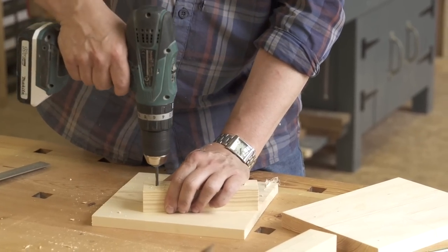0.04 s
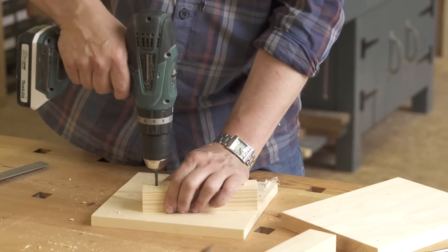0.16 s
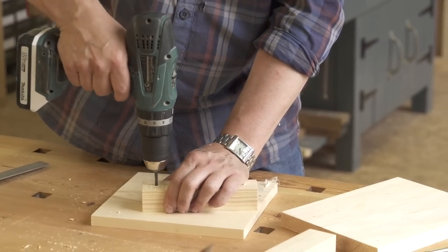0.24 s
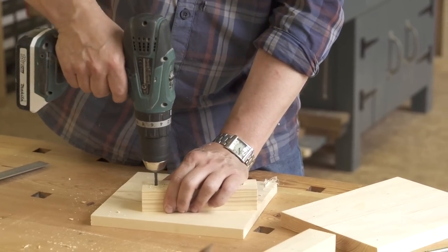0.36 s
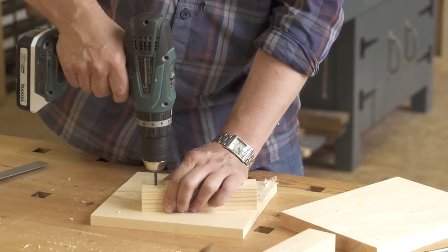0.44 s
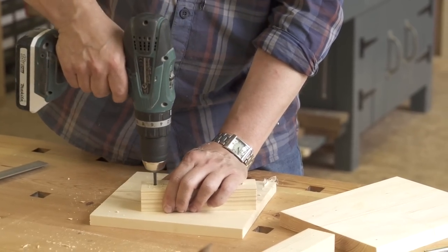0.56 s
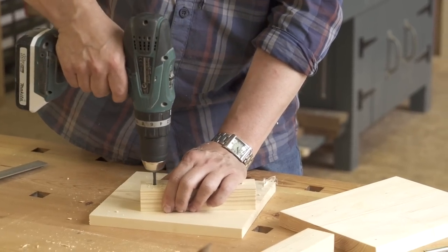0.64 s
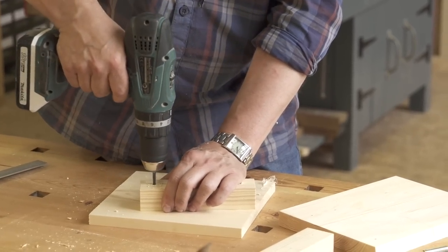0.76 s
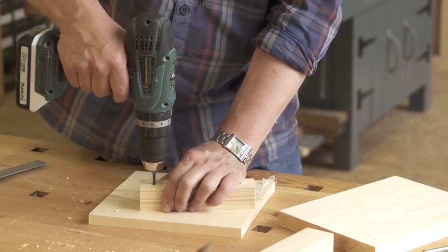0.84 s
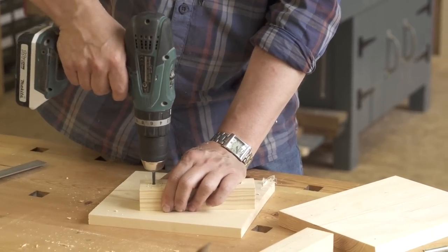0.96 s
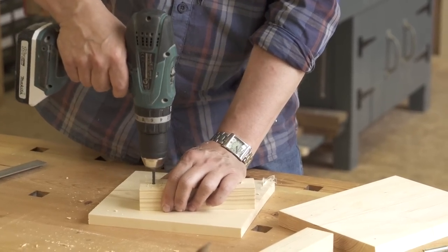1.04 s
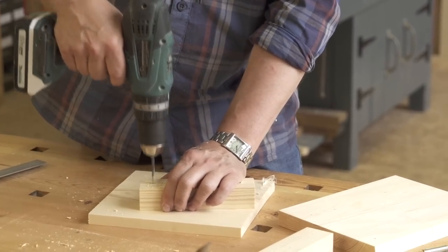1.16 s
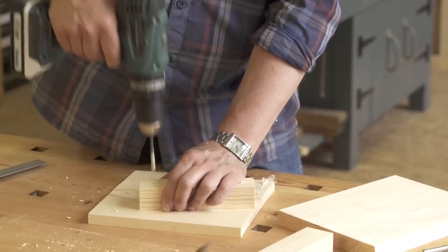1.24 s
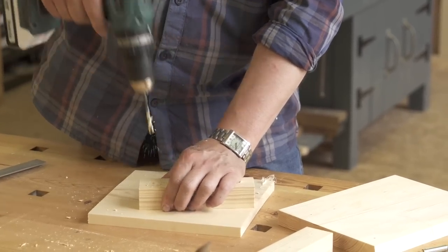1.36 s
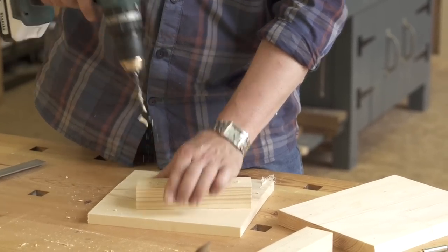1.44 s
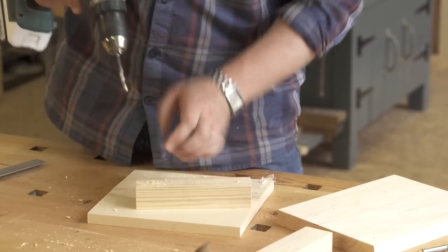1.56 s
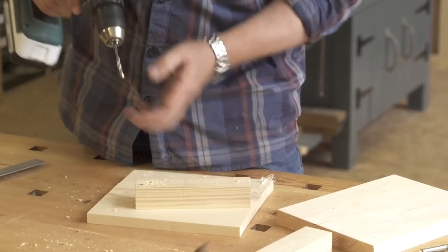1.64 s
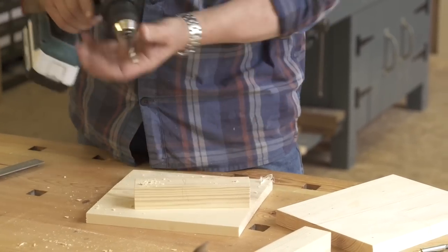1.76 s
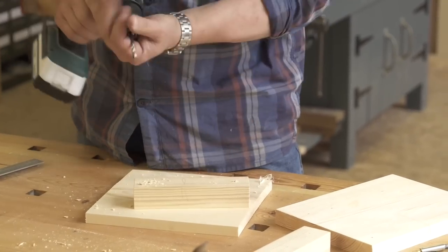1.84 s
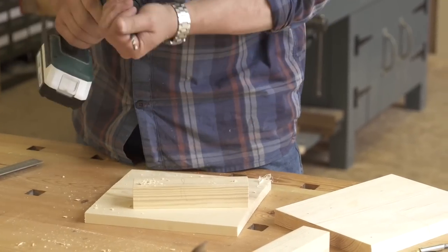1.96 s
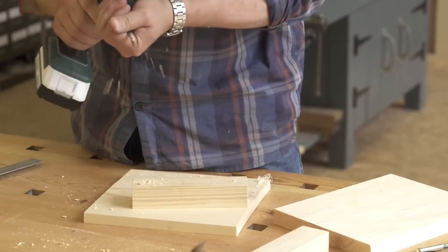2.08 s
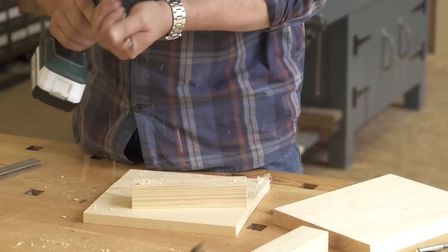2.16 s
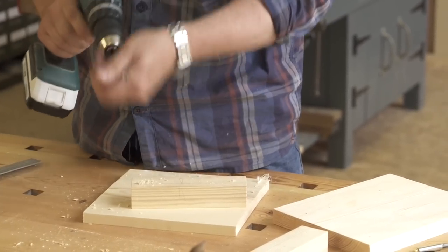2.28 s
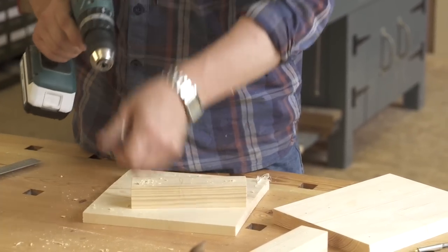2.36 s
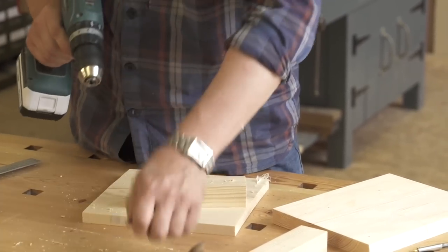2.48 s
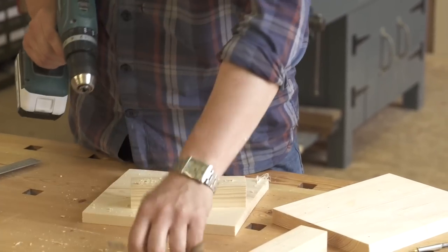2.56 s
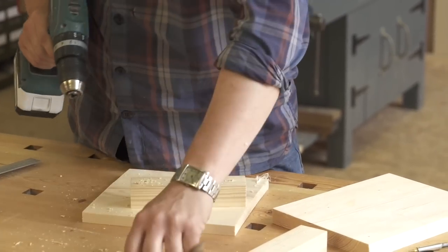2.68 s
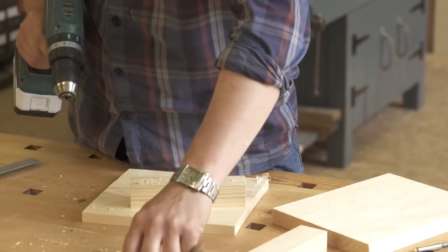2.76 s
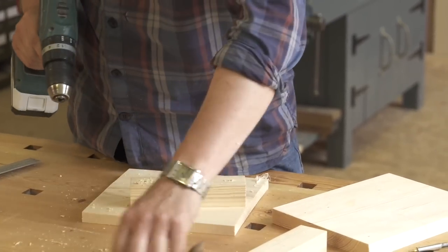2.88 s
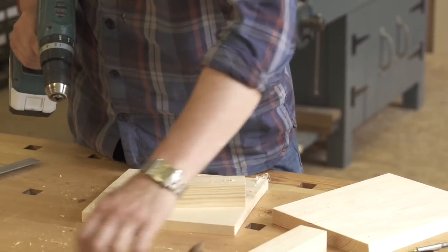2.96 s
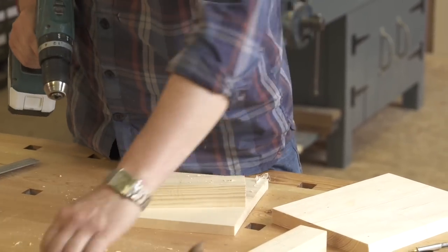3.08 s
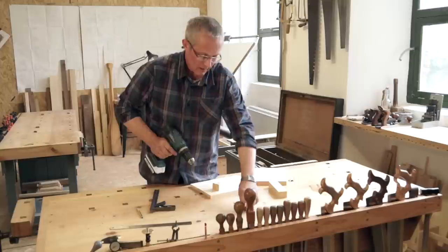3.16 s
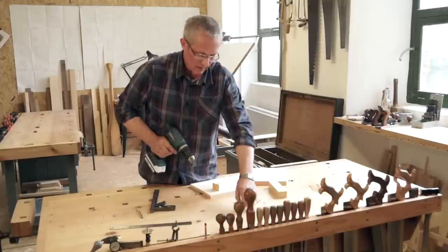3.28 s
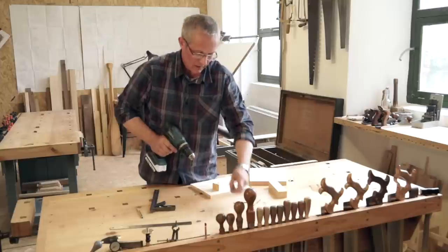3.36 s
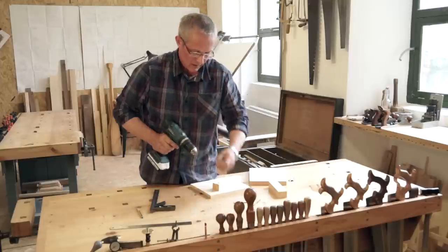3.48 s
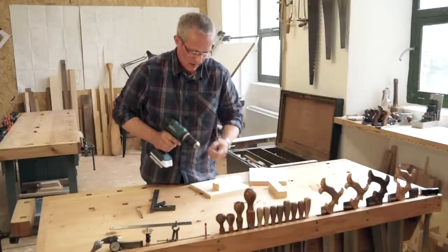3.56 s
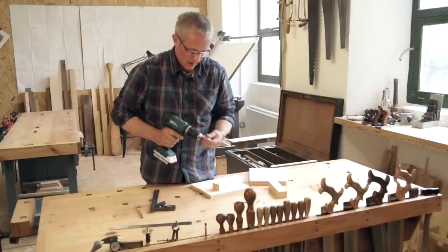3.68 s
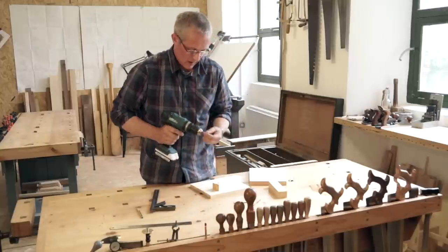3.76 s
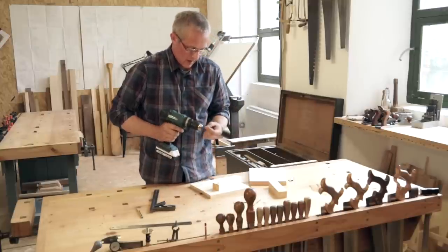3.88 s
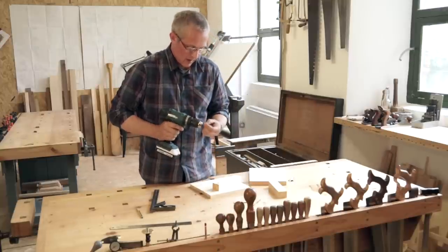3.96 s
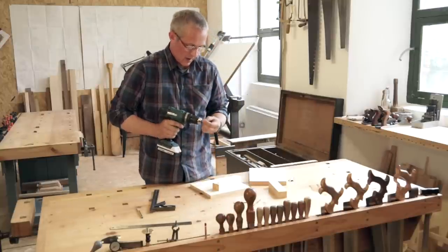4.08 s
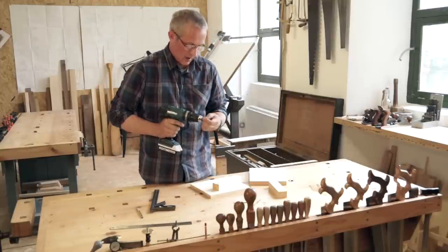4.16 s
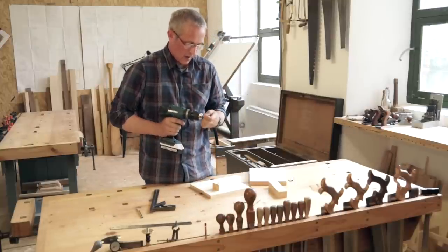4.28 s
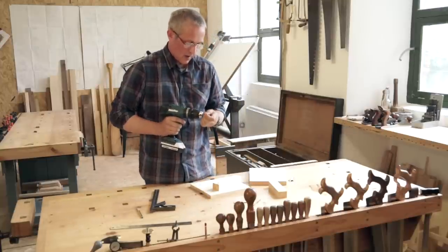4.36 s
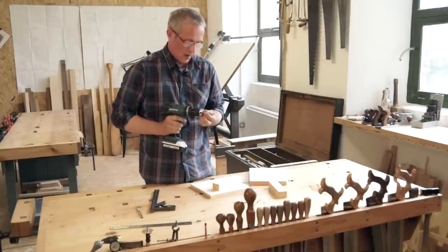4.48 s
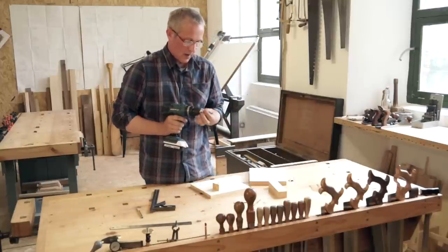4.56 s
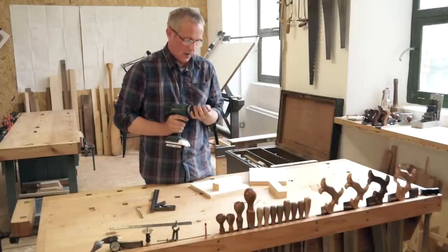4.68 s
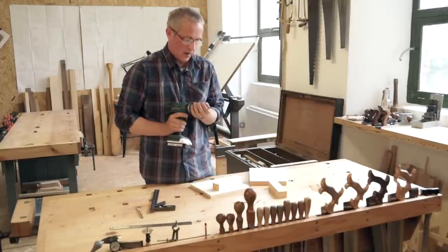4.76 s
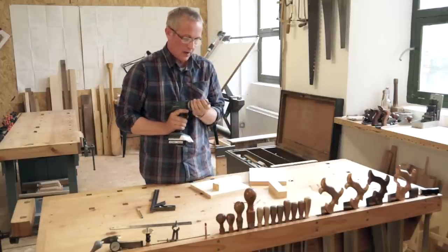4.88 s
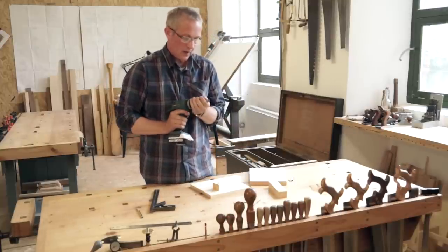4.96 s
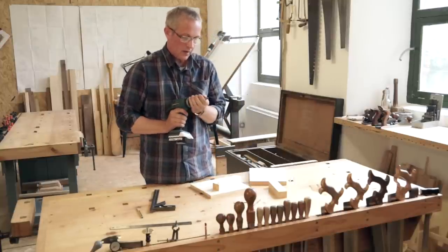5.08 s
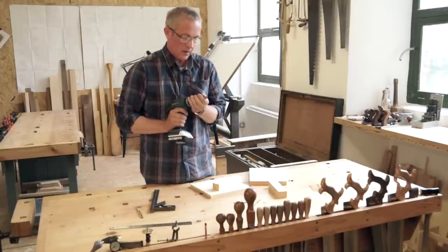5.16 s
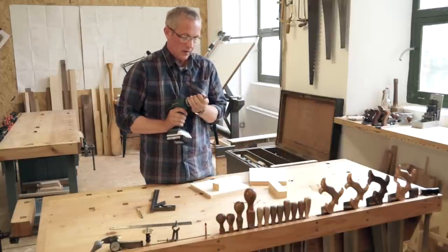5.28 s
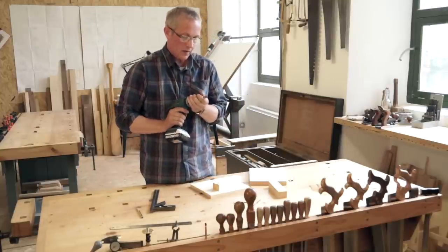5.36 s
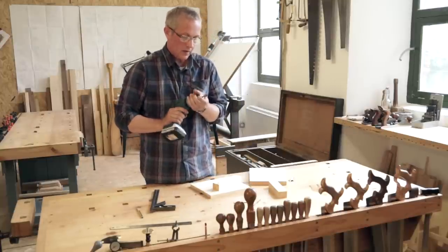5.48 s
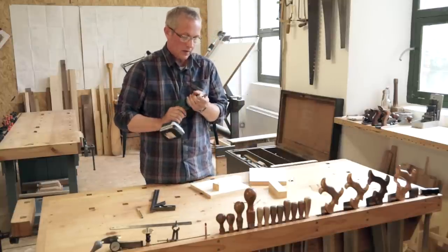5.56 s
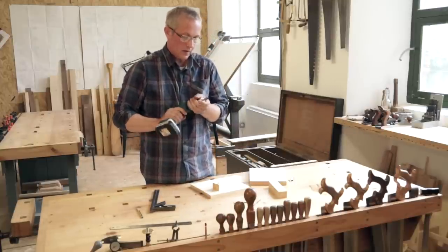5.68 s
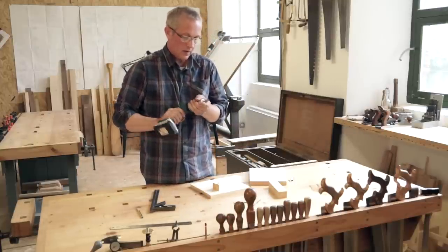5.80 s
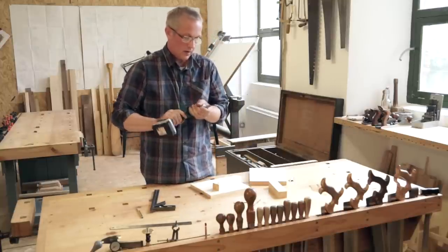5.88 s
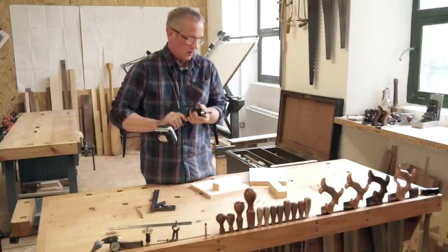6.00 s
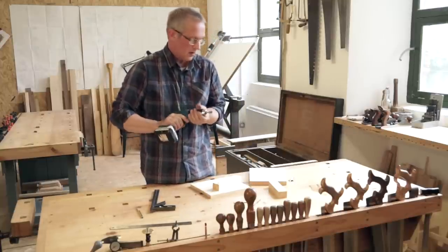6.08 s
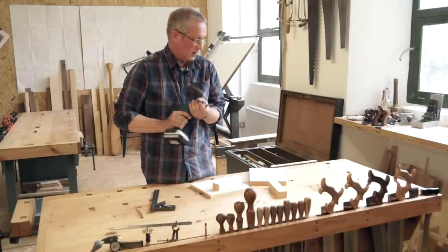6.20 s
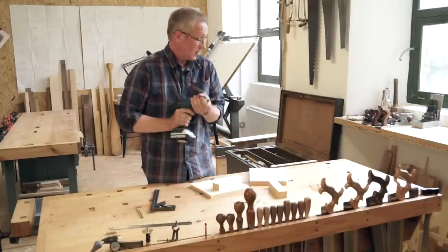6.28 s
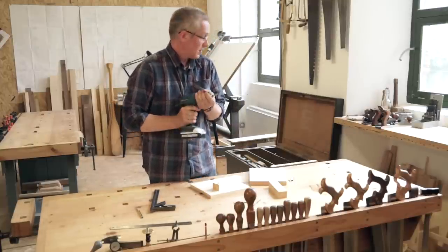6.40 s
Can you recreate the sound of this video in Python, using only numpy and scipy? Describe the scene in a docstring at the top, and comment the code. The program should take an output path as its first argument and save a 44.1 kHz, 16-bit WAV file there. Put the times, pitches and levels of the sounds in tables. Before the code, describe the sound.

High whirring drill bores a wooden block on a bench, stops, blips once, then after small knocks gives three quick growling bursts amid rattles.

```python
"""A cordless drill bores through a pine block on a workbench, brakes, and is then blipped four times while
the chuck is opened and closed on a new bit. Gears are near sines on the mesh pitch; brushes and fan are shaped
noise. Noise pulsed once a turn rings block and bench; short noise scrapes ring chuck and bit; rubs are grainy
noise. A large hard-walled workshop adds a diffuse noise tail, over steady hiss and a low hum. Mono in two channels."""
import sys
import numpy as np
from scipy import signal
from scipy.fft import rfft, irfft
from scipy.io import wavfile

SR = 44100
rng = np.random.default_rng(int(sys.argv[2]) if len(sys.argv) > 2 else 0)


def wav_record(signal):
    """Record a signal, one row per channel, as 16-bit PCM in the file named by sys.argv[1]."""
    frames = np.transpose(np.atleast_2d(signal))
    bounded = np.clip(frames, -1, 1)
    # unit amplitude maps onto the largest positive 16-bit level
    quanta = np.round(bounded * 32767).astype(np.int16)
    wavfile.write(sys.argv[1], SR, quanta)


N = 283739

# trigger pulls, one list each: t/s, gear mesh f/Hz, gear reference level/dB, whirr level/dB
PULLS = [
    [(0, 2262, -59, -46), (.3, 2242, -62, -45.5), (.42, 2297, -55.5, -46), (.78, 2450, -53.5, -44.5),
     (.94, 2389, -51, -45), (1.05, 2457, -75, -45), (1.26, 2634, -60.5, -44.5), (1.33, 2630, -75, -46),
     (1.375, 2392, -60, -46), (1.42, 2290, -66, -64)],
    [(2.015, 2396, -76, -67), (2.046, 2413, -61, -54), (2.066, 2456, -56, -42), (2.16, 2492, -63.5, -44),
     (2.248, 2416, -58.5, -45), (2.29, 2440, -74, -64)],
    [(5.06, 2500, -92, -75), (5.09, 2580, -61, -54), (5.13, 2603, -76, -47.5), (5.162, 2698, -61, -44),
     (5.19, 2756, -43.5, -38.5), (5.25, 2775, -44.5, -41), (5.314, 2795, -44.5, -43.5),
     (5.34, 2640, -52, -41.5), (5.385, 2530, -53.5, -46.5), (5.42, 2470, -51, -47)],
    [(5.55, 2187, -58, -64), (5.578, 2521, -57, -47), (5.605, 3042, -51.5, -45), (5.64, 3263, -48.5, -48),
     (5.665, 3160, -50.5, -48), (5.68, 2554, -50, -50), (5.71, 2110, -52, -47)],
    [(5.77, 1900, -62, -52), (5.798, 2064, -52, -49.5), (5.852, 2506, -48.5, -47.5),
     (5.89, 2875, -57.5, -45.5), (5.95, 2570, -66, -54)],
]


def from_db(db):
    """Decibels to amplitude gain."""
    return 10 ** (np.asarray(db) / 20)


def rms_one(x):
    """Scale to unit rms."""
    return x / np.sqrt(np.mean(x ** 2) + 1e-20)


def butter(x, order, hz, kind):
    """Butterworth filter."""
    return signal.sosfilt(signal.butter(order, hz, kind, fs=SR, output="sos"), x)


def in_time(rows):
    """Columns interpolated to samples, and a gate that is open while the table lasts."""
    s, *columns = np.transpose(rows)
    t = np.arange(N) / SR
    opening = np.clip((t - s[0]) / 0.015, 0, 1) if s[0] > .01 else 1
    closing = np.clip((s[-1] - t) / 0.024, 0, 1)
    return [np.interp(t, s, c) for c in columns], opening * closing


def at_hz(points, hz):
    """Read a frequency table on a log-frequency axis."""
    table_hz, values = np.transpose(points)
    return np.interp(np.log(hz), np.log(table_hz), values)


def drift(rate_hz):
    """Low-passed noise of unit rms, computed at every 40th sample."""
    r = np.exp(-2 * np.pi * rate_hz * 40 / SR)
    white = rng.standard_normal(N // 40 + 2002)
    slow = signal.lfilter([1], [1, -2 * r, r * r], white)[2000:]   # drop the settling
    return np.interp(np.arange(N) / 40, np.arange(len(slow)), rms_one(slow))


def coloured(spectrum):
    """Steady noise of the given spectral shape, unit rms."""
    hz = np.maximum(np.fft.rfftfreq(N, 1 / SR), 1)
    shaped = rfft(rng.standard_normal(N)) * from_db(at_hz(spectrum, hz))
    return rms_one(irfft(shaped, N))


def resonate(x, modes):
    """Parallel two-pole resonances, peak gain set by level, signs alternating."""
    out = 0
    for k, (hz, width_hz, level_db) in enumerate(modes):
        r = np.exp(-np.pi * abs(width_hz) / SR)
        b = [(1 - r * r) / 2, 0, -(1 - r * r) / 2]
        a = [1, -2 * r * np.cos(2 * np.pi * hz / SR), r * r]
        out = out + (-1) ** k * from_db(level_db) * signal.lfilter(b, a, x)
    return out


def whine(hz, wobble, flutter_db):
    """Near sine whose pitch (rms share) and level (rms dB) shake."""
    phase = 2 * np.pi * np.cumsum(hz * (1 + wobble * drift(60.2))) / SR
    sine = np.sin(phase + rng.uniform(0, 2 * np.pi))
    return np.sqrt(2) * sine * from_db(flutter_db * drift(47))


def gears():
    """Gear train: partials at fixed multiples of the mesh pitch, which follows each trigger pull."""
    # gear train partials: multiple of mesh pitch, then level re gear reference/dB in each of the five pulls
    partials = [(.125, -36, -20, -48, -12, -31), (.235, -6, -15, -27, -4.5, -5),
                (.36, -36, -8, -13, -1.5, -4.5), (.46, -15.5, -9, -13.5, -1, 3),
                (.67, -20, -4, -26, -7, -1), (1.0, 1.5, 1.5, 1.5, 0.5, 0), (1.4, -6.5, 7, -9.5, -9, -2),
                (1.991, -4, -11, -18, -15, -25), (2.88, -19, -36, -20, -7, -24),
                (3.499, -10, -14, -20, -17, -22)]
    # pitch shake in each pull, rms share of the pitch
    pull_wobble = [.008, .03, .009, .045, .022]
    # extra level of the partials above the mesh pitch in each pull/dB
    pull_upper_db = [-2.5, -15, 1, -6.5, -2.5]
    out = np.zeros(N)
    for pull, rows in enumerate(PULLS):
        (mesh_hz, mesh_db, _), gate = in_time(rows)
        for multiple, *levels_db in partials:
            upper_db = pull_upper_db[pull] if multiple > 1.2 else 0
            level_db = mesh_db + levels_db[pull] + upper_db
            partial = whine(multiple * mesh_hz, pull_wobble[pull], flutter_db=3.5)
            out += gate * from_db(level_db) * partial
    return out


def brushes_and_fan():
    """Whirr: fluttering broadband noise plus housing and chuck resonances, retuned in tone for each pull."""
    # brush, fan and gear noise spectrum: f/Hz, relative level/dB
    whirr_spectrum = [(150, -28), (250, -17.5), (570, -8.5), (768, -8), (1150, -4.5), (1940, -9.5),
                      (2400, -4), (3650, -4), (4350, -6), (14300, -24), (15700, -20.5), (16500, -48)]
    # housing and chuck resonances: f/Hz, width/Hz, relative level/dB
    housing_modes = [(1120, 105, -7.5), (2520, 220, 0.5), (4620, 700, -3.5), (5680, 250, -7)]
    # gain below 2 kHz in each pull/dB
    pull_growl_db = [-0.5, 2.5, 1, 3.5, 7]
    # gain above 6 kHz in each pull, at its loudest whirr/dB
    pull_treble_db = [6.5, 5, 6.5, 1.5, 2]
    treble_db_per_db, treble_floor_db = -0.02, -7   # treble gain falls slightly as whirr rises
    noise = coloured(whirr_spectrum) * from_db(1.54 * drift(270))
    ringing = from_db(8.0) * resonate(rms_one(rng.standard_normal(N)), housing_modes)
    whirr = rms_one(butter(noise + ringing, 4, 230, "high"))   # a small body sheds no bass
    treble = butter(whirr, 2, 6000, "high")
    growl = butter(whirr, 2, 2000, "low")
    out = np.zeros(N)
    for pull, rows in enumerate(PULLS):
        (_, _, whirr_db), gate = in_time(rows)
        treble_db = pull_treble_db[pull] + treble_db_per_db * (whirr_db - whirr_db.max())
        treble_gain = from_db(np.maximum(treble_db, treble_floor_db))
        growl_gain = from_db(pull_growl_db[pull])
        tilted = whirr + (treble_gain - 1) * treble + (growl_gain - 1) * growl
        out += gate * from_db(whirr_db) * tilted
    return out


def other_whines():
    """Single near sines with pitches of their own, level wavering."""
    # four in the first pull, a squeak as the third starts, a steel ring outlasting the brake:
    # t/s, f/Hz, level/dB
    whines = [
        [(0, 4220, -56), (.25, 4296, -64), (.6, 4263, -51.5), (1.27, 4240, -58), (1.3, 4180, -68)],
        [(0, 4587, -55), (.15, 4580, -51.5), (.3, 4380, -55.5), (.45, 4200, -71)],
        [(.95, 4680, -66), (1.03, 4880, -57), (1.1, 5090, -53), (1.32, 5440, -57.5), (1.385, 5133, -56)],
        [(1.2, 3590, -66), (1.25, 3660, -59), (1.31, 3730, -59), (1.35, 3580, -61), (1.375, 3340, -47.5),
         (1.4, 3300, -67)],
        [(5.05, 4370, -68), (5.068, 4300, -60), (5.095, 4430, -66)],
        [(0, 14000, -62), (1.1, 13930, -66), (1.38, 13900, -58), (1.49, 13930, -66), (1.62, 14040, -95)],
    ]
    # pitch shake of each, rms share of the pitch
    whine_shake = [.0015, .009, .02, .006, .02, .007]
    waver_db, waver_hz = 2, 4.4
    out = np.zeros(N)
    for rows, shake in zip(whines, whine_shake):
        (hz, level_db), gate = in_time(rows)
        level_db = level_db + waver_db * drift(waver_hz)
        out += gate * from_db(level_db) * whine(hz, shake, flutter_db=3.5)
    return out


def boring():
    """The flutes tear fibres once a turn; block and bench top ring along."""
    # bit in the wood: t/s, bench hum level/dB, block rasp level/dB
    cut = [(0, -55, -47), (.2, -53.5, -47.5), (.43, -54, -54), (.85, -53, -64.5), (1.15, -57.5, -57.5),
           (1.3, -53, -65.5), (1.41, -68.5, -54), (1.45, -73, -60)]
    # bench top resonances: f/Hz, width/Hz, relative level per pass/dB
    bench_modes = [(60, 25, -2), (92, 23, 3.5), (131.5, 58, 1)]
    # pine block resonances: f/Hz, width/Hz, relative level/dB
    block_modes = [(270, 60, -2.5), (502, 97, 0), (745, 88, -6), (1034, 210, -2.5), (1800, 470, -4.5)]
    spindle_hz = 25.26
    waver_db, waver_hz = 3, 11.7   # uneven grain
    (bench_db, block_db), gate = in_time(cut)
    phase = 2 * np.pi * spindle_hz * np.arange(N) / SR + 0.9 * drift(4.6)
    tearing = rng.standard_normal((2, N)) * (1 + .5 * np.sin(phase))
    bench = rms_one(resonate(resonate(tearing[0], bench_modes), bench_modes))   # two passes
    block = rms_one(resonate(tearing[1], block_modes))
    hum = from_db(bench_db + waver_db * drift(waver_hz)) * bench
    rasp = from_db(block_db + waver_db * drift(waver_hz)) * block
    return gate * (hum + rasp)


def clicks():
    """Each contact is a scrape of a few milliseconds that drives the broad modes of wood, plastic and steel."""
    # contacts of drill, bench, bit, and dull blows:
    # t/s, level/dB, scrape time constant/ms, thud and knock offset/dB, ping, top and snap offset/dB
    drill_clicks = [(.011, -23.5, 2.2, -11, -13), (.081, -23.5, 2.2, -1.5, 1), (.12, -22.5, 1.5, -2, 0),
                    (.155, -28, 1.6, -1.5, -8), (1.363, -28, 1.5, -2, -1), (1.373, -31, 1.6, 2.5, -1),
                    (1.409, -32.5, 2.2, 3, 2.1), (1.669, -29, 1.4, -17, -15),
                    (1.677, -38.5, 1.04, 2.5, -11), (1.698, -42.5, 1.55, -18, -6),
                    (1.749, -49, 1.44, -1, 4), (1.89, -52, 1.8, 0, 3), (1.901, -45, 1.27, 4.5, -26),
                    (1.925, -47, 1.4, -6, -8), (1.966, -53, 1.6, -16, -12), (2.017, -52, 0.82, -1, 5),
                    (2.05, -24.5, 1.1, -0.5, 5), (2.063, -18, 2.7, -22, -1), (4.057, -40, 3.6, -5, 7.5),
                    (4.392, -60, 1.5, -8, 8), (4.479, -48.5, 1.5, -8, -1.1), (4.582, -53, 5.3, -7, 4),
                    (4.69, -45, 0.81, -1, -2), (4.753, -54, 2.2, -7, 1), (4.855, -53, 2, -11, 2.1),
                    (4.939, -34, 2.1, -0.5, 4), (4.969, -36.5, 0.97, 1.5, 2), (5.085, -43, 0.98, 5, 1),
                    (5.096, -48.5, 1.6, 15.5, 7), (5.121, -42, 2, 14, 8), (5.184, -9.5, 1.7, -23, -4),
                    (6.125, -50, 1.7, 2, -9), (6.181, -50.5, 1.5, 2.1, -4), (6.225, -46.5, 1.8, -4, -3),
                    (6.239, -44, 1.7, -6, -2), (6.266, -43.5, 1.2, -15, 2), (6.326, -39.5, 1.6, -22, 3)]
    bench_knocks = [(2.572, -47, 2.5, 0, 0), (2.73, -47, 0.87, 7, 6), (2.751, -32, 1.95, 0.5, -12),
                    (2.801, -34.5, 2.7, -3, -.1), (3.182, -41, 1.2, -1, 5)]
    bit_pings = [(3.784, -49.5, 2.4, -5, 14.5), (3.947, -46.5, 2.7, 8, 0), (3.954, -40.5, 3.2, -9, 4.5),
                 (4.019, -57, 1.3, 11, 0), (4.189, -57.5, 1.5, 1, 3), (4.328, -66, 2.1, -7, 12.5)]
    thumps = [(2.05, -35.5, 4.0, 0, 0), (2.752, -47.5, 1.9, 0, 0), (3.205, -60.5, 8.0, 0, 0)]
    # drive of each mode group by kind of contact: thud, knock, tick, steel ping, top, snap/dB
    drill_colour = (-11, 5, 6, -23, -8.5, -4.5)
    bench_colour = (-0.5, 3.5, -6, -25, -32, -22)
    bit_colour = (-18, -1, 5, 3, -20, -4.5)
    thump_colour = (10, 4, -25, -40, -40, -40)
    # modes in those six groups: f/Hz, width/Hz, level before width correction/dB
    click_modes = [
        [(142, 114, 3.5), (418, 204, 4.5)],
        [(1140, 430, 1.9)],
        [(2410, 600, -4), (4120, 1400, -4.5), (5420, 3030, -2.5), (6930, 4700, -11)],
        [(11000, 600, 3.5)],
        [(13200, 590, 0), (15000, 2100, -3)],
        [(9700, 10000, 3.5)],
    ]
    kinds = [(drill_clicks, drill_colour), (bench_knocks, bench_colour),
             (bit_pings, bit_colour), (thumps, thump_colour)]
    contacts = [row for rows, _ in kinds for row in rows]
    s, level_db, scrape_ms, low_db, bright_db = np.transpose(contacts)
    colour_db = np.transpose([colour for rows, colour in kinds for _ in rows])
    drive_db = level_db + colour_db + [low_db, low_db, 0 * s, bright_db, bright_db, bright_db]
    ms = np.arange(600) * 1000 / SR
    age = ms / np.clip(scrape_ms[:, None], .2, 9)   # in time constants
    envelope = np.minimum(1.92 * age, 1) * np.exp(-age)
    scrape = np.tanh(rng.standard_normal(age.shape)) * envelope
    at = np.round(s * SR).astype(int)[:, None] + np.arange(len(ms))
    out = np.zeros(N)
    for group_db, modes in zip(drive_db, click_modes):
        force = np.full(N, 1e-18)
        np.add.at(force, at, from_db(group_db)[:, None] * scrape)
        for hz, width_hz, mode_db in modes:
            width_db = 10 * np.log10(3000 / width_hz)   # narrow modes gather less
            ringing = resonate(force, [(hz, width_hz, mode_db + width_db)])
            out += resonate(ringing, [(hz, 2 * width_hz, 0)])   # steeper skirts
    return out


def rustle():
    """Sleeve, fingers and bit rub on bench and chuck: grainy friction noise with a dull and a bright part."""
    # rubs: start t/s, swell/s, fade/(dB/s), dull part level/dB, bright part level/dB
    rubs = [(2.752, 0.029, 90, -58, -82), (3.17, .01, 90, -77.5, -82), (4.05, .015, 59, -77, -77),
            (4.57, .1, 66, -72, -86), (4.8, 0.26, 300, -77, -83), (6.15, .08, 132, -63.5, -69.5),
            (6.33, 0.092, 30, -77, -78)]
    swell_db = 13   # a rub starts this far under its top
    grains = rng.standard_normal(N) * from_db(4.1 * drift(120))
    dull = rms_one(butter(grains, 2, [430, 3420], "band"))
    bright = rms_one(butter(grains, 2, 4600, "high"))
    out, t = 0, np.arange(N) / SR
    for s, swell_s, fade_db_per_s, dull_db, bright_db in rubs:
        late_s = t - s - swell_s   # after the top
        shape_db = np.minimum(swell_db * late_s / swell_s, -fade_db_per_s * late_s)
        shape = (t > s) * from_db(shape_db)
        out = out + shape * (from_db(dull_db) * dull + from_db(bright_db) * bright)
    return out


def workshop(x):
    """Diffuse noise tail that swells briefly and dies band by band."""
    # reverberation time: f/Hz, T60/s
    room_t60 = [(100, 0.98), (250, 1.04), (500, 1.38), (1400, 1.08), (3700, 0.93), (8000, 0.67),
                (15000, 0.22)]
    room_db, build_s = -8, 0.017
    t = np.arange(int(1.6 * SR)) / SR
    edges_hz = 60 * 2 ** np.arange(0, 8.6, .5)   # half octaves
    white, tail = rng.standard_normal((2, len(t))), 0
    for k, (low_hz, high_hz) in enumerate(zip(edges_hz, edges_hz[1:])):
        band = butter(white[k % 2], 2, [low_hz, high_hz], "band")
        t60_s = at_hz(room_t60, np.sqrt(low_hz * high_hz))
        tail = tail + band * from_db(-60 * t / t60_s)
    tail = tail * (1 - np.exp(-(t / build_s) ** 2))
    tail = tail / np.sqrt(np.sum(tail ** 2))
    lead = SR // 2   # mirrored lead-in: the room already rings at the start
    wet = signal.fftconvolve(np.r_[x[lead:0:-1], x], tail)
    return from_db(room_db) * wet[lead:lead + N]


def idle():
    """Idle workshop: steady shaped noise and a narrow hum whose pitch and level waver."""
    # hiss spectrum: f/Hz, relative level/dB
    hiss_spectrum = [(12, -42), (20, 2), (43, -8.5), (62, -3), (139, -11), (281, -15), (452, -22.5),
                     (1140, -26), (2060, -31), (2580, -27.5), (9950, -40.5), (13600, -41), (16500, -59)]
    # low hum: t/s, level/dB
    hum_levels = [(0, -58.5), (.35, -51), (.6, -69), (1.2, -67), (1.8, -63), (2.5, -67), (3.7, -64.5),
                  (4.05, -66), (4.35, -80), (5.2, -60.5), (5.8, -70.5), (6.43, -73)]
    hiss_db = -70.5
    hum_hz, hum_width_hz = 53.9, 12.3
    waver_db, waver_hz = 3.5, 4
    (hum_db,), _ = in_time(hum_levels)
    hum = whine(hum_hz + hum_width_hz / 2 * drift(4.88), wobble=0.0058, flutter_db=0.0)
    hum = from_db(hum_db + waver_db * drift(waver_hz)) * hum
    return from_db(hiss_db) * coloured(hiss_spectrum) + hum


def scene():
    """Drill, wood, clicks and rustle in the room, over the idle floor; the same in both channels."""
    drill = gears() + brushes_and_fan() + other_whines()
    near = drill + boring() + clicks() + rustle()
    return np.tile(near + workshop(near) + idle(), (2, 1))


def record(dry):
    """Steep low-pass: 60 dB down from 16.4 kHz."""
    return signal.sosfilt(signal.cheby2(14, 60, 16400, fs=SR, output="sos"), dry)


dry = scene()
out = record(dry)
wav_record(out)
```